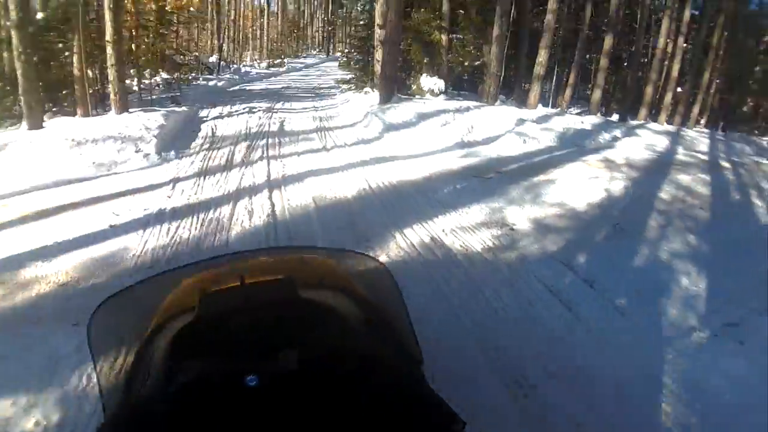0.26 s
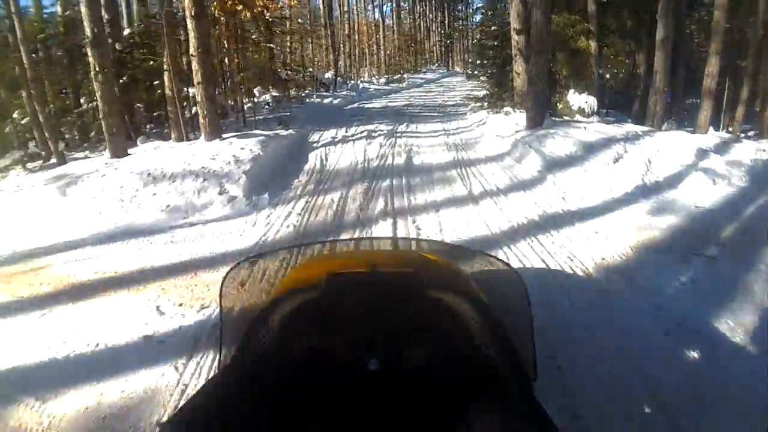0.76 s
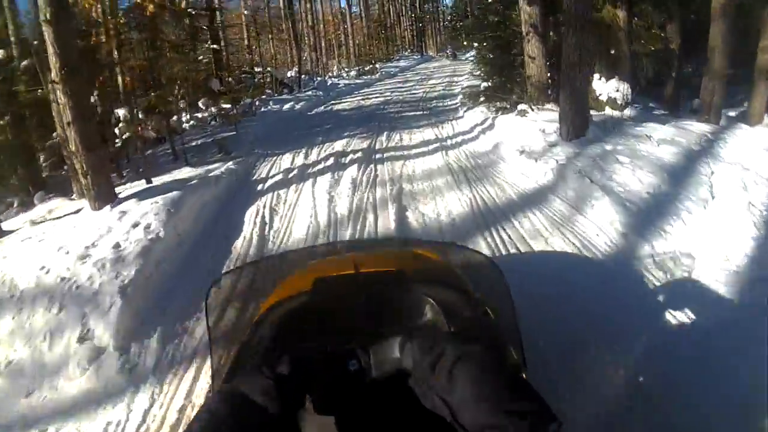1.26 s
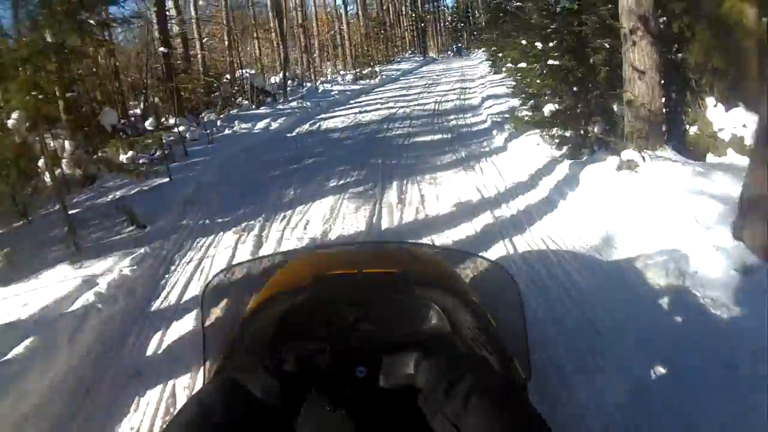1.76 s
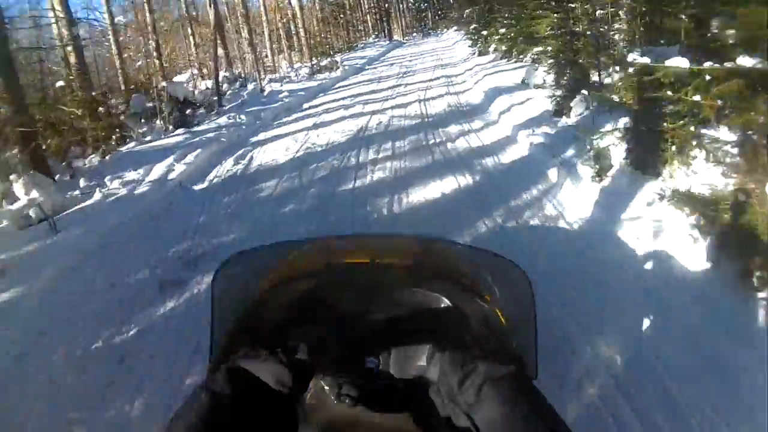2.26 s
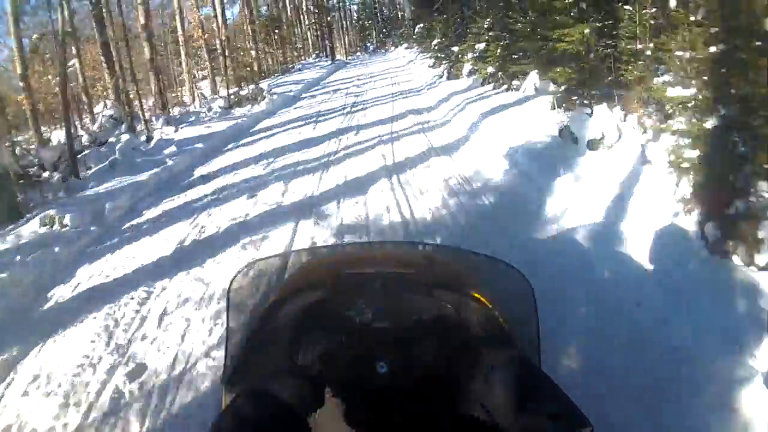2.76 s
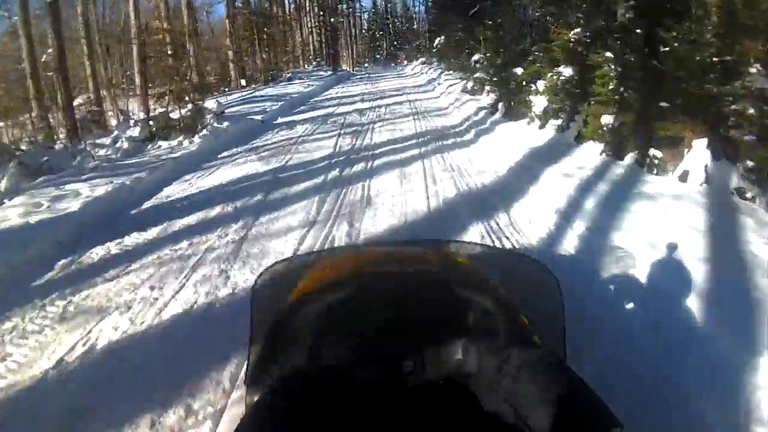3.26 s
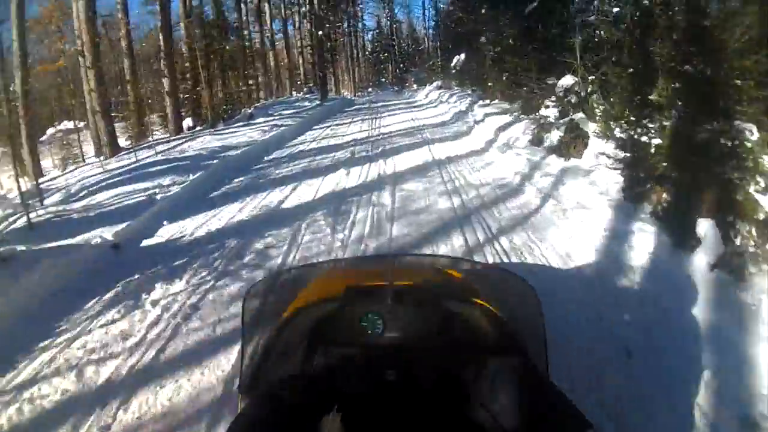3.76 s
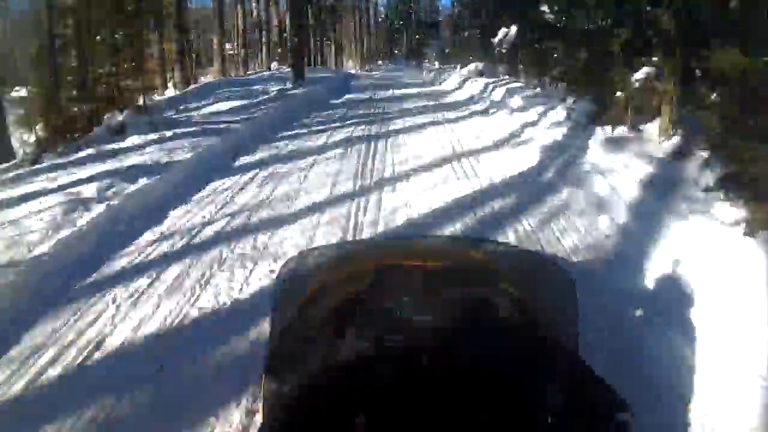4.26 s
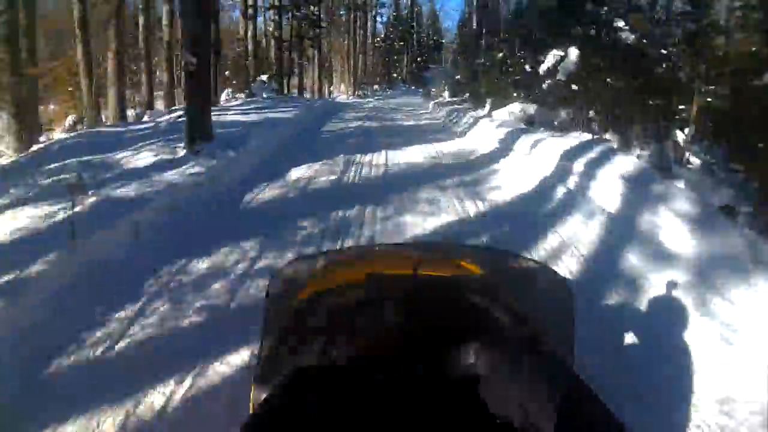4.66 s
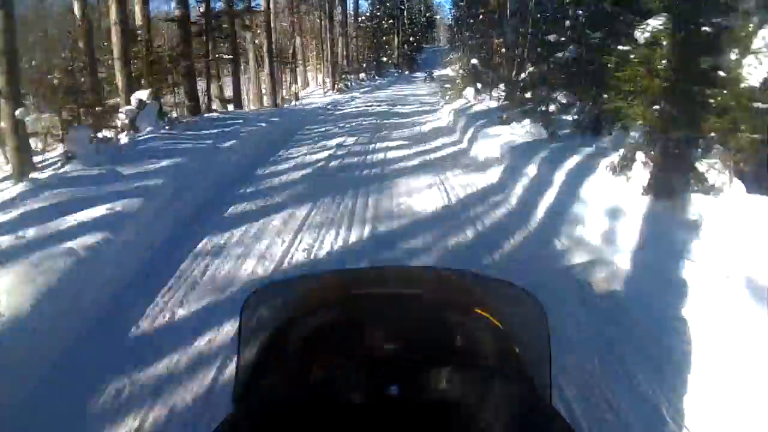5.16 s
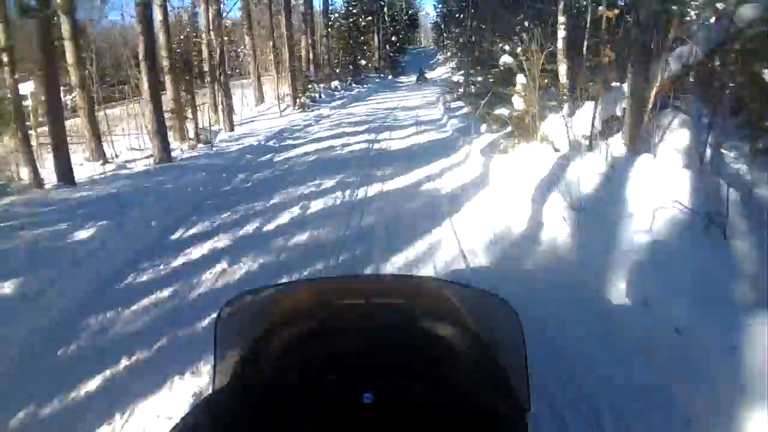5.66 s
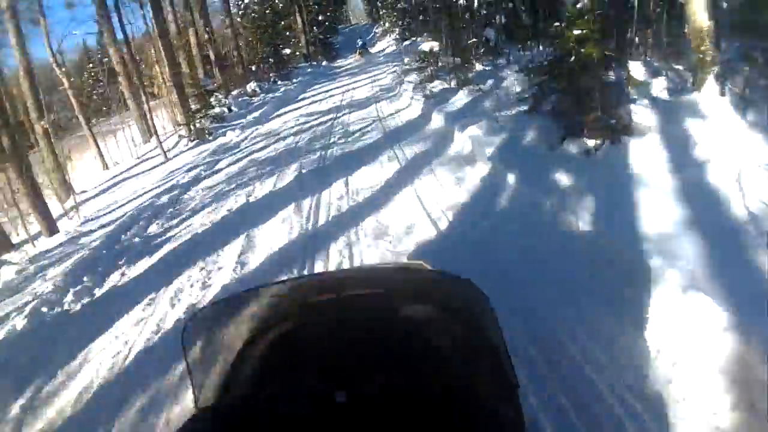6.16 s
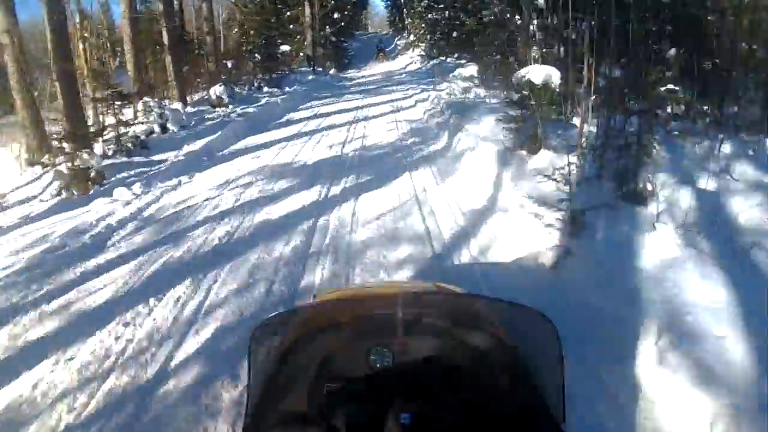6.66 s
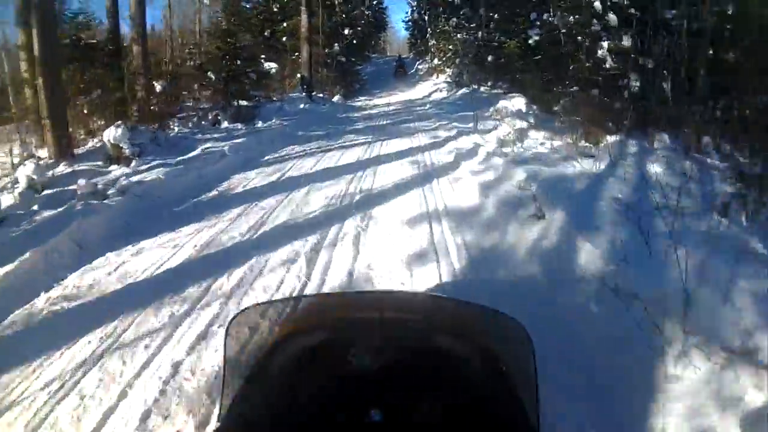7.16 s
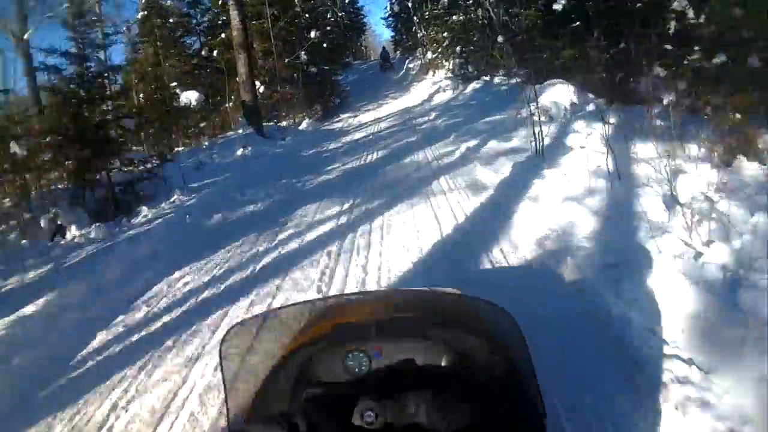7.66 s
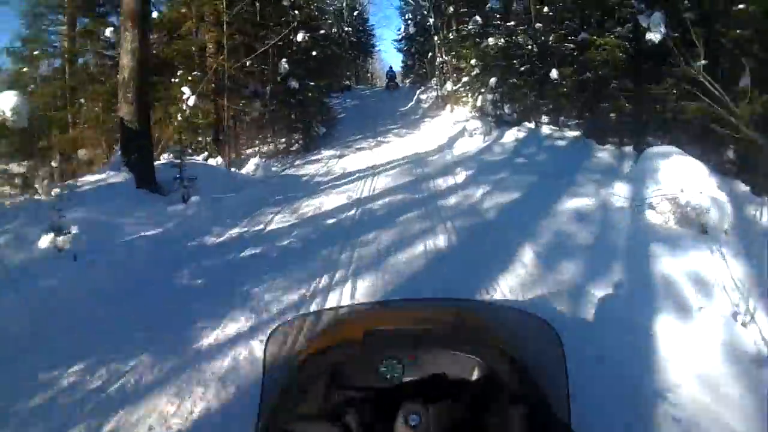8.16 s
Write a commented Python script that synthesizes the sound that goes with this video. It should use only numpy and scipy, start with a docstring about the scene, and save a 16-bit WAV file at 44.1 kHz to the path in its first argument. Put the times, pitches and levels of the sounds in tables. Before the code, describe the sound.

A two-stroke snowmobile heard from the seat pulls away, revs to a loud buzzing cruise, eases off, then picks up gently with trail knocks.

```python
"""Snowy trail, from the seat of a two-stroke twin snowmobile: it pulls away, cruises, coasts, picks up again.
Crank harmonics and pulsing noise ring through the hood; a sine at the firing rate is the exhaust boom.
A sine fan whine, track hum, rumble and ticks, snow hiss and wind noise follow engine or ground speed.
Trail bumps strike decaying panel modes and thump the suspension."""
import sys
import numpy as np
from scipy import signal
from scipy.fft import rfft, irfft
from scipy.io import wavfile
from scipy.ndimage import uniform_filter1d, map_coordinates

SR = 44100
rng = np.random.default_rng(int(sys.argv[2]) if len(sys.argv) > 2 else 0)


def dump(signal):
    """Clip the signal to [-1, 1] and save it as 16-bit WAV at the path in sys.argv[1]."""
    limited = np.clip(np.atleast_2d(signal).T, -1, 1)
    pcm = np.round(limited * 32767).astype(np.int16)
    wavfile.write(sys.argv[1], SR, pcm)


N = 370440
TIME = np.arange(N) / SR
FREQS = np.maximum(np.arange(N // 2 + 1) * SR / N, 1)


def undb(db):
    """Decibels to gain."""
    return 10 ** (np.asarray(db) / 20)


def unit(x):
    """Scale to rms 1."""
    return x / np.sqrt(np.mean(x ** 2))


def curves(table):
    """Each column of a timed table, sample by sample."""
    s, *columns = np.transpose(table)
    return [np.interp(TIME, s, c) for c in columns]


def walk(rate_hz):
    """Smooth random curve, rms 1, that changes about rate_hz times a second."""
    coarse_s = TIME[::64]
    knots = rng.standard_normal(4096)
    curve = map_coordinates(knots, [coarse_s * rate_hz], order=3, mode="wrap")
    return np.interp(TIME, coarse_s, unit(curve))


def slope_db(points, hz):
    """Read a spectrum on a log-frequency axis."""
    at_hz, db = np.transpose(points)
    return np.interp(np.log(hz), np.log(at_hz), db)


def resonances_db(table, at_hz=FREQS):
    """Bell-shaped peaks and hollows over frequency."""
    return sum(db * np.exp(-np.log(16) * ((at_hz - hz) / width_hz) ** 2) for hz, width_hz, db in table)


def bells(events, heights):
    """Sum of bell-shaped rises and falls in time, one per (centre, level, length) event."""
    return sum(h * np.exp(-((TIME - s) / length_s) ** 2) for (s, _, length_s), h in zip(events, heights))


def swells(table):
    """A bell-shaped rise and fall of gain for each event."""
    return bells(table, [undb(db) for _, db, _ in table])


def colour(x, gain_db):
    """Filter by a gain for each frequency; rms 1."""
    return unit(irfft(rfft(x) * undb(gain_db), N))


def noise(gain_db):
    """White noise filtered by a gain for each frequency; rms 1."""
    return colour(rng.standard_normal(N), gain_db)


# crank harmonics: shaft_multiple, low_revs_db, full_revs_low_gear_db, full_revs_high_gear_db (relative)
CRANK_ORDERS = [(1, -4, -35.5, -29.5), (3, -7.5, -23, -22), (4, -1.5, -11.5, -12), (5, -23, -36.5, -24),
                (6, -14, -12.5, -28), (7, -30, -18, -16.5), (8, -12, -9.5, -8), (9, -11.5, -33, -20.5),
                (10, -12.5, -18, -17), (11, -12, -25.5, -17), (12, -15.5, -18.5, -34),
                (13, -18.5, -12, -14.5), (14, -18, -23, -17.5), (15, -16.5, -15, -18.5),
                (16, -16.5, -10, -10.5), (17, -19.5, -17.5, -24), (18, -19, -15, -17),
                (19, -14, -21.5, -22), (20, -19.5, -30, -24.5), (21, -32, -14, -19.5),
                (22, -20, -24, -12.5), (23, -31.5, -24, -22), (24, -20.5, -22, -11.5),
                (25, -30, -17.5, -19.5), (26, -23, -22, -33), (27, -20.5, -24.5, -33.5),
                (28, -17, -18.5, -21), (29, -30, -31.5, -27), (30, -19, -25.5, -20.5),
                (31, -29, -18.5, -24), (32, -14.5, -23, -22.5), (33, -27.5, -18.5, -22.5),
                (34, -29, -27, -18.5), (35, -15, -14, -16.5)]
# exhaust pipe and airbox, harmonics only: centre_hz, width_hz, gain_db
PIPE_RESONANCES = [(325, 63, 3.5), (395, 52, 1.5), (469, 39, 4.5), (518, 131, 11), (610, 110, -2.5),
                   (700, 370, -3.5), (984, 60, 6.5), (1258, 23, 7.5), (2780, 170, 0)]
# belt drive reaches high gear
UPSHIFT_S, UPSHIFT_LENGTH_S = 3.35, 0.084


def engine(shaft_hz, turn_rad, shut, hood, part_hz=93, full_hz=107, drift_db=1.5, stumble_db=2.0):
    """One smeared pulse a turn: harmonics sweep through resonances, their pattern set by revs and gear."""
    flutter_db, flutter_hz, drift_hz, smear_rad = 1.5, 12, 3, .15
    revved = np.clip((shaft_hz - part_hz) / (full_hz - part_hz), 0, 1)
    gear = np.clip((TIME - UPSHIFT_S) / UPSHIFT_LENGTH_S, 0, 1)
    response_db = hood + resonances_db(PIPE_RESONANCES)
    # harmonics waver more with the throttle shut
    waver_depth_db = flutter_db + stumble_db * shut ** 2
    out = 0
    for multiple, part_db, low_db, high_db in CRANK_ORDERS:
        k = round(multiple)
        full_db = low_db + gear * (high_db - low_db)
        level_db = part_db + revved * (full_db - part_db) + np.interp(k * shaft_hz, FREQS, response_db)
        waver_db = waver_depth_db * walk(flutter_hz) + drift_db * walk(drift_hz)
        # higher harmonics leave later, spreading the pulse over the turn
        out = out + undb(level_db + waver_db) * np.sin(k * turn_rad - smear_rad * k ** 2)
    return np.sqrt(2) * out


def exhaust(turn_rad, flutter_db=0.4):
    """Two firings a turn; the silencer leaves their fundamental as a smooth boom."""
    return np.sqrt(2) * np.sin(2 * turn_rad) * undb(flutter_db * walk(20))


def burble(turn_rad, shut, burble_db=-60, scatter_db=5, pipe_hz=190, pipe_width_hz=140):
    """As the throttle shuts, uneven firings pop in the silencer, a band-pass."""
    fires = np.diff((turn_rad / np.pi).astype(int), prepend=0)
    pops = fires * undb(scatter_db * np.clip(rng.standard_normal(N), -2, 2))
    low_hz = pipe_hz / (1 + pipe_width_hz / pipe_hz / 2)
    high_hz = pipe_hz + pipe_width_hz / 2
    silencer = signal.butter(2, [low_hz, high_hz], "bandpass", fs=SR, output="sos")
    return undb(burble_db) * shut ** 2 * unit(signal.sosfilt(silencer, pops))


def rattle(turn_rad, hood, scatter_db=0.6, tilt_db_per_octave=1, rattle_db=1.0):
    """Piston slap, clutch rattle: noise swells gently at two firings a turn, one stronger, sizes vary slightly."""
    turn_depth, firing_depth = .15, .18
    half_turn = (turn_rad / np.pi).astype(int)
    size_db = scatter_db * rng.standard_normal(4096)[half_turn]
    gate = np.exp(turn_depth * np.cos(turn_rad) + firing_depth * np.cos(2 * turn_rad)) * undb(size_db)
    tilt_db = tilt_db_per_octave * np.log2(FREQS / 1500)
    return undb(rattle_db) * colour(gate * rng.standard_normal(N), hood + tilt_db)


# broad colour of sound leaving the hood: freq_hz, gain_db
HOOD_COLOUR = [(30, -37.5), (70, -33), (110, -26), (170, -14.5), (260, -16.5), (450, -17.5), (800, -4),
               (1500, -3), (2900, -2), (3800, -13), (4500, -30.5), (5300, -31.5), (6000, -58)]
# hood and windscreen resonances and hollows: centre_hz, width_hz, gain_db
HOOD_RESONANCES = [(612, 60, -15), (1007, 110, 11.5), (1312, 162, 7), (1753, 205, 11), (1853, 42, -8),
                   (2180, 200, 6.5), (2400, 144, -10), (2743, 143, 7.5), (3420, 230, -9.5)]


def hood_db():
    """Hood response: broad colour plus resonances, with the high treble held in."""
    treble_loss_db = 20 * np.log10(1 + (FREQS / 6500) ** 8)
    return slope_db(HOOD_COLOUR, FREQS) + resonances_db(HOOD_RESONANCES) - treble_loss_db


# fan duct resonances and hollows: centre_hz, width_hz, gain_db
DUCT_RESONANCES = [(1150, 96, -8.5), (1270, 35, 4), (1347.4, 48, 9.5), (1750, 90, 14.5)]
FAN_DB = -49.5  # before duct gain


def fan(shaft_hz, turn_rad, flutter_db=2, slip_rad=0.27):
    """Belt-driven cooling fan: whines between two crank harmonics, flares as it crosses a duct resonance."""
    blades_per_turn = 17.56  # per crank turn
    level_db = FAN_DB + resonances_db(DUCT_RESONANCES, blades_per_turn * shaft_hz)
    phase_rad = blades_per_turn * turn_rad + slip_rad * walk(30)
    return np.sqrt(2) * undb(level_db + flutter_db * walk(25)) * np.sin(phase_rad)


# track on packed snow: freq_hz, gain_db
RUMBLE_COLOUR = [(25, -19.5), (55, -11.5), (90, -5.5), (150, 4), (210, 3.5), (330, -6), (540, -1.5),
                 (700, -3.5), (1500, -43.5)]
# tunnel over the track: centre_hz, width_hz, gain_db
TUNNEL_RESONANCES = [(203, 55, 3.5)]
HUM_DB, HUM_DB_PER_OCTAVE = -59.5, 9  # at cruise before resonance gain; per doubling of ground speed


def track(lug_hz, pace_oct, flutter_db=3, second_db=-12, wobble=.02, rumble_db=-57, speed_power=0.49):
    """Lugs strike drive wheel and snow: hum pitch and level, and rumble level, follow ground speed."""
    body_db = slope_db(RUMBLE_COLOUR, lug_hz) + resonances_db(TUNNEL_RESONANCES, lug_hz)
    level_db = HUM_DB + HUM_DB_PER_OCTAVE * pace_oct + body_db
    phase_rad = 2 * np.pi * np.cumsum(lug_hz * (1 + wobble * walk(25))) / SR
    tones = np.sin(phase_rad) + undb(second_db) * np.sin(2 * phase_rad)
    hum = np.sqrt(2) * undb(level_db + flutter_db * walk(17)) * tones
    rumble = noise(slope_db(RUMBLE_COLOUR, FREQS))
    return hum + undb(rumble_db) * (lug_hz / lug_hz.mean()) ** speed_power * rumble


def clatter(hood, rate_hz=900, spread_db=1.5, tilt_db_per_octave=-1, clatter_db=-2):
    """Track clips and ice crumbs tick against the tunnel: random impulses through the hood."""
    hits = (rng.random(N) < rate_hz / SR) * rng.choice([-1, 1], N)
    ticks = hits * undb(spread_db * np.minimum(rng.exponential(size=N), 4))
    tilt_db = tilt_db_per_octave * np.log2(FREQS / 1500)
    return undb(clatter_db) * colour(ticks, hood + tilt_db)


# skis and suspension: start_s, level_db (before knock_db), hardness_db_per_octave, thud_db (relative)
SKI_KNOCKS = [(0.4747, -28, 2.5, -28), (0.635, -19, 2.5, -32), (1.1466, -19.5, 4, -44),
              (1.5541, -22, 0, -35), (3.5514, -18, 2.5, -24), (4.004, -17.5, -0.5, -27),
              (4.073, -20, 1, -25), (4.144, -13, 6, -40), (4.9544, -19, 1, -35), (5.49, -17, 0, -41),
              (5.5509, -25, 0, -27), (6.1613, -10.5, 0, -45), (6.3589, -25.5, -13, -26),
              (6.4057, -22.5, 2, -13), (6.5489, -27.5, -4, -14), (6.8182, -21.5, 6.5, -27),
              (7.098, -18, 0.5, -26), (7.1729, -19, 3, -28), (7.208, -19.5, 1.5, -18),
              (7.2466, -25.5, 0, -13), (7.9485, -28.5, 0.5, -24), (8.1602, -24, 2.5, -29)]
# panel modes: pitch_hz (before detune), t60_s, level_db (before hardness tilt)
PANEL_MODES = [(1047, 0.029, -6), (1254, 0.0098, 0.5), (1570, 0.01, -1.5), (2120, 0.018, -1.5),
               (2820, 0.0069, -8), (3065, 0.01, -11), (3970, 0.012, -16), (4560, 0.01, -24.5)]


def knocks(echo_s=0.002266, echo=0.71, echo_top_hz=3200, knock_db=2.5, thud_hz=270, thud_t60_s=0.018):
    """Each knock rings panel modes over a dull chassis thud; the windscreen echoes the ring, duller."""
    out, t = np.zeros(N + SR), TIME[:SR // 10]
    hz, t60_s, mode_db = np.transpose(PANEL_MODES)[:, :, None]
    sign = (-1) ** np.arange(len(PANEL_MODES))[:, None]
    late = np.maximum(t - echo_s, 0)
    echo_gain = echo / (1 + (hz / echo_top_hz) ** 4)
    thud_tone = np.sin(2 * np.pi * thud_hz * t) * np.exp(-np.log(1000) * t / thud_t60_s)
    for start_s, level_db, hard_db, thud_db in SKI_KNOCKS:
        detune = 1 + .012 * rng.standard_normal(hz.shape)
        pole = 2j * np.pi * hz * detune - np.log(1000) / t60_s
        modes = np.exp(pole * t).imag + echo_gain * np.exp(pole * late).imag
        ring = np.sum(sign * undb(mode_db + hard_db * np.log2(hz / 2000)) * modes, axis=0)
        knock = ring / np.abs(ring).max() + undb(thud_db) * thud_tone
        start = int(start_s * SR)
        out[start:start + len(t)] += undb(level_db + knock_db) * knock
    # plastic and rubber contacts are too soft for high treble
    return signal.sosfilt(signal.butter(8, 4700, fs=SR, output="sos"), out[:N])


# chassis bottoms in a dip: centre_s, level_db, length_s
TRAIL_DIPS = [(.635, -47, 0.015), (3.56, -46.5, 0.051), (3.64, -48.5, 0.034), (4.07, -53, .03),
              (6.41, -36.5, 0.0072), (6.817, -46, 0.024)]
# colour of that thump: freq_hz, gain_db
THUMP_COLOUR = [(25, -12), (80, -23.5), (160, -8.5), (270, 4.5), (450, -15), (750, 1.5), (1200, -13.5),
                (3000, -67.5)]


def dips():
    """Suspension takes a dip: short thumps of coloured noise."""
    return swells(TRAIL_DIPS) * noise(slope_db(THUMP_COLOUR, FREQS))


# fine hiss of spraying snow: freq_hz, gain_db
SPRAY_COLOUR = [(4500, -29), (5200, -4.5), (6000, -13.5), (6700, 2.5), (8000, -12.5), (9400, 8),
                (11000, 7.5), (13500, 0.5), (15500, -26)]


def spray(noise_db, tones_db, spray_db=-38, spray_follow=0.54):
    """Spraying snow: treble noise whose level follows a blend of running noise and engine tones."""
    level_db = spray_db + noise_db + spray_follow * (tones_db - noise_db)
    return undb(level_db) * noise(slope_db(SPRAY_COLOUR, FREQS))


# over the windscreen: centre_s, level_db (before buffeting), length_s
WIND_GUSTS = [(3.57, -65, .12), (4.12, -60, .15)]
WIND_DB, WIND_DB_PER_OCTAVE = -75.5, 1.5  # at cruise, before buffeting; per doubling of ground speed


def wind(pace_oct, corner_hz=38, buffet_db=3):
    """Faint low-passed buffeting grows with ground speed; gusts spill over the windscreen."""
    steady = undb(WIND_DB + WIND_DB_PER_OCTAVE * pace_oct)
    gain = (steady + swells(WIND_GUSTS)) * undb(buffet_db * walk(7))
    return gain * noise(-20 * np.log10(1 + (FREQS / corner_hz) ** 4))


# crankshaft speed: time_s, shaft_hz
SHAFT_SPEED = [(0.0, 63.25), (0.55, 72.1), (1.0, 75.96), (1.15, 75.9), (1.78, 90.6), (2.12, 108.2),
               (2.5, 110.9), (3.25, 109), (3.43, 111.2), (3.7, 110.2), (4.15, 111.4), (4.53, 111.2),
               (4.65, 99.94), (5.0, 80.35), (5.5, 73.34), (5.85, 73), (6.0, 74.46), (6.6, 74.5),
               (6.8, 76.3), (6.95, 82.4), (7.3, 88.7), (7.75, 86.57), (8.4, 86.5)]
# rider's thumb: time_s, opening_0_to_1
THROTTLE_OPENING = [(0, 0.57), (1.55, 0.49), (2.05, 0.98), (2.35, 1), (2.7, 0.86), (4.52, 0.89),
                    (4.6, 0.53), (4.85, 0.17), (6.6, 0.17), (7.1, 0.39), (8.4, 0.29)]
# ground speed as lugs passing the drive wheel: time_s, lug_hz
TRACK_SPEED = [(0, 65.73), (1.5, 119.3), (2.3, 202.2), (4.45, 282.3), (5.1, 247.8), (6.3, 213.4),
               (8.4, 202)]
# engine note sags briefly: centre_s, depth_db, length_s
NOTE_SAGS = [(3.015, -2.5, .07), (3.417, -3.5, 0.036)]
CRUISE_SHAFT_HZ, CRUISE_LUG_HZ = 110, 240
# base gains at cruise, throttle wide open
BOOM_DB, TONES_DB, RUNNING_DB = -37.5, -27, -35.5
# change with throttle fully shut
BOOM_SHUT_DB, TONES_SHUT_DB = -28, -11
# first two per doubling of crank speed, last per doubling of ground speed
TONES_DB_PER_OCTAVE, RUNNING_DB_PER_OCTAVE, TRAIL_DB_PER_OCTAVE = 14, 12, 0.7
# load sways with the uneven trail
SWAY_DB, SWAY_HZ = 0.3, 6
# rising revs lift running noise, falling revs weaken tones; full effect at SURGE_HZ_PER_S
STRAIN_DB, OVERRUN_DB, SURGE_HZ_PER_S = 1, -4.5, 34


def scene():
    """Sources ride along with the listener: revs, throttle and ground speed drive their levels and pitches."""
    (shaft_hz,), (throttle,), (lug_hz,) = curves(SHAFT_SPEED), curves(THROTTLE_OPENING), curves(TRACK_SPEED)
    # octaves above cruise
    revs_oct, pace_oct = np.log2(shaft_hz / CRUISE_SHAFT_HZ), np.log2(lug_hz / CRUISE_LUG_HZ)
    shut = 1 - np.clip(throttle, 0, 1)
    sway_db = SWAY_DB * walk(SWAY_HZ)
    surge = np.gradient(uniform_filter1d(shaft_hz, SR // 20)) * SR / SURGE_HZ_PER_S
    strain_db = STRAIN_DB * np.clip(surge, 0, 1)
    overrun_db = OVERRUN_DB * np.clip(-surge, 0, 1)
    sag_db = bells(NOTE_SAGS, [db for _, db, _ in NOTE_SAGS])

    boom_db = BOOM_DB + BOOM_SHUT_DB * shut + sway_db
    tones_db = TONES_DB + TONES_DB_PER_OCTAVE * revs_oct + TONES_SHUT_DB * shut + sag_db + sway_db
    speed_db = RUNNING_DB_PER_OCTAVE * revs_oct + TRAIL_DB_PER_OCTAVE * pace_oct
    noise_db = RUNNING_DB + speed_db + strain_db + sag_db / 2 + sway_db

    # uneven combustion: crank runs slightly ahead and behind
    jitter_rad = .006 * walk(60) + .015 * walk(9)
    turn_rad = np.abs(2 * np.pi * np.cumsum(shaft_hz) / SR + jitter_rad)
    hood = hood_db()
    tones = undb(tones_db) * engine(shaft_hz, turn_rad, shut, hood)
    motor = undb(overrun_db) * (tones + fan(shaft_hz, turn_rad))
    pipe = undb(boom_db) * exhaust(turn_rad) + burble(turn_rad, shut)
    running = undb(noise_db) * (rattle(turn_rad, hood) + clatter(hood))
    trail = track(lug_hz, pace_oct) + knocks() + dips() + spray(noise_db, tones_db)
    return (motor + pipe + running + trail + wind(pace_oct))[None]


# camera electronics: freq_hz, gain_db
HISS_COLOUR = [(3000, -13), (8000, -14), (9800, 6), (14900, 3.5), (15170, 5), (15500, -1.5)]
TOP_HZ = 15700


def record(dry, hiss_db=-83):
    """Camera electronics add faint hiss and a thin whistle; a steep low-pass cuts the top."""
    hiss = undb(hiss_db) * noise(slope_db(HISS_COLOUR, FREQS))
    whistle = undb(-87) * np.sin(2 * np.pi * 15164 * TIME)
    fade = np.clip(np.minimum(TIME, TIME[-1] - TIME) / .003, 0, 1)  # 3 ms at both ends
    top_cut = signal.ellip(10, .2, 80, TOP_HZ, fs=SR, output="sos")
    return signal.sosfilt(top_cut, fade * (dry + hiss + whistle))


dry = scene()
out = record(dry)
dump(out)
```